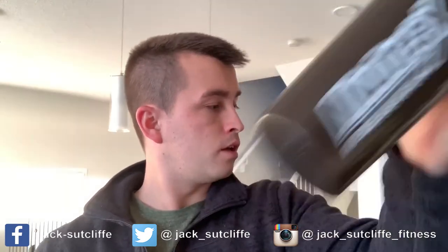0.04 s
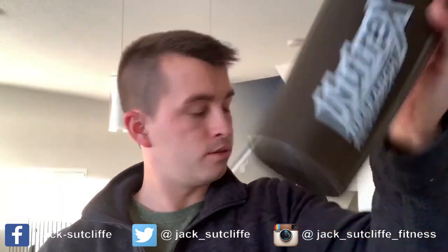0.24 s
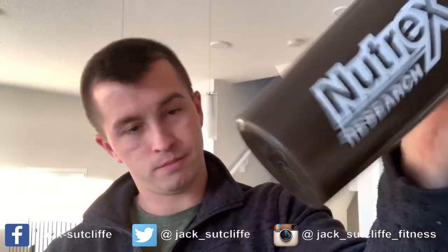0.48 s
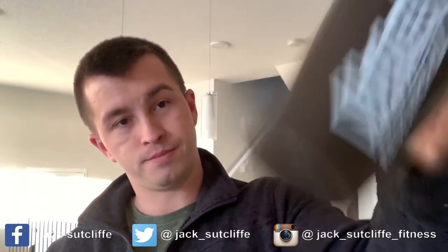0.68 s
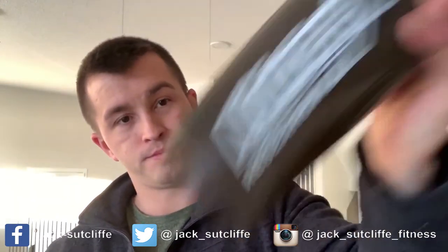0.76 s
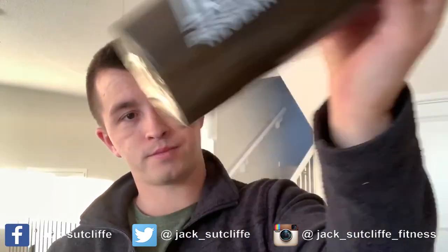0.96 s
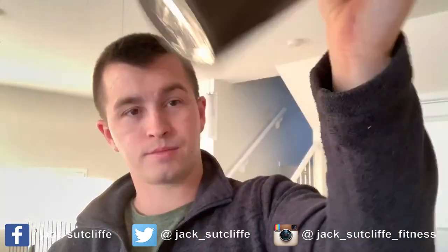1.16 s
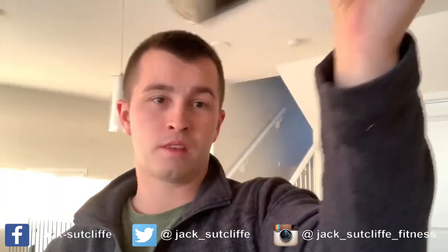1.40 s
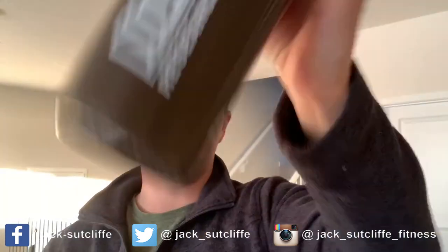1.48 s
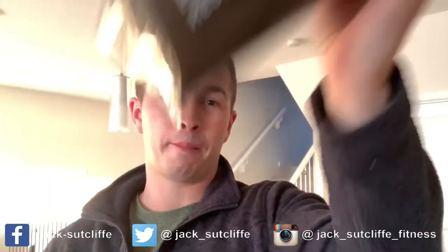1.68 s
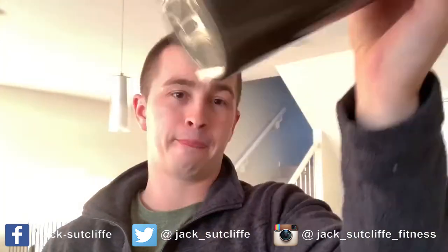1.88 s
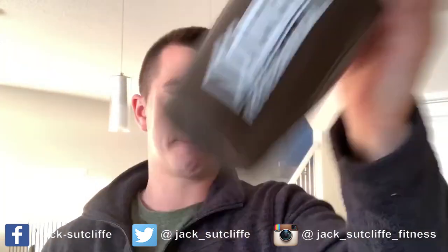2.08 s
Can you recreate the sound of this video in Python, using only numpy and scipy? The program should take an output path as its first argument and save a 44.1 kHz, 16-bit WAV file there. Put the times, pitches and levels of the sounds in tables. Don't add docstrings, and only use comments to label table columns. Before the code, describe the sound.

Close, bright sloshing of liquid in a hand-shaken plastic bottle: each shake sprays the lid, then slaps back onto the base with tiny ticks and gulps, over faint indoor room tone, stopping mid-shake.

```python
import sys
import numpy as np
from scipy import signal
from scipy.fft import rfft, irfft, next_fast_len
from scipy.io import wavfile

SR = 44100
rng = np.random.default_rng(int(sys.argv[2]) if len(sys.argv) > 2 else 0)


def log_audio(samples):
    frames = np.atleast_2d(samples).T
    limited = np.clip(frames, -1, 1)
    pcm = np.round(limited * 32767).astype(np.int16)
    wavfile.write(sys.argv[1], SR, pcm)


def voltage_ratio(decibels):
    exponent = np.asarray(decibels, float) / 20
    return 10 ** exponent


N = 94770

# f/Hz, level/dB
ROOM_TONE_COLOUR = [(40, 1), (150, -6.5), (500, -7.5), (1500, -16), (4000, -22), (8000, -26), (15500, -40)]
# t/s, level/dB, f/Hz
WALL_THUMPS = [(0.034, -60, 62.6), (.118, -50.5, 71), (0.137, -51.5, 51.6), (0.347, -46.5, 58.3),
               (0.089, -56, 60), (0.457, -52.5, 56), (.97, -56, 60), (0.572, -53, 67.6), (0.69, -56, 59.4),
               (0.732, -59, 60), (0.787, -45.5, 68), (0.826, -51.5, 59.6), (0.894, -51, 92.6),
               (1.032, -47, 90.7), (1.067, -49.5, 56), (1.15, -54.5, 59), (1.243, -51, 63.5),
               (1.364, -50.5, 58.4), (1.387, -57, 50), (1.466, -46, 54.6), (1.578, -54.5, 60),
               (1.634, -54.5, 59), (1.692, -50, 62), (1.75, -57.5, 97), (1.84, -55, 97), (1.954, -45, 53),
               (2.075, -56, 56)]
# t/s, peak/dB
WALL_TICKS = [(0.18, -34), (.268, -32), (0.409, -41), (0.4288, -31), (.614, -31), (.7741, -31),
              (.8984, -31), (0.9756, -33), (0.9981, -28), (1.3467, -28), (1.257, -33), (1.5643, -34),
              (1.5797, -31), (1.6656, -29), (1.8227, -29), (1.9309, -31), (1.952, -30), (2.0537, -35),
              (2.0706, -31), (2.135, -32), (2.1464, -26)]
# t/s, peak/dB
SEAL_SPITS = [(0.1526, -44.5), (0.18, -45), (0.1864, -49), (0.1965, -23.5), (0.406, -40), (0.43, -27.5),
              (0.4933, -35), (0.6469, -59), (0.6694, -38), (0.9004, -30.5), (1.1333, -35), (1.1413, -34),
              (1.348, -34), (1.3606, -28), (1.4536, -43), (1.5044, -45), (1.524, -29.5), (1.5454, -50),
              (1.5853, -29), (1.6656, -37), (1.6814, -50), (1.8238, -32.5), (1.831, -26.5), (1.9315, -31.5),
              (1.9494, -36), (2.0695, -39)]
# t/s, peak/dB, f/Hz
BUBBLE_GULPS = [(0.0075, -39, 2280), (0.114, -42, 1100), (0.1206, -44.5, 197), (0.1262, -38, 563),
                (0.223, -32, 2920), (0.3367, -37, 900), (0.3427, -43, 317), (0.4308, -35.5, 3370),
                (0.4719, -34.5, 2180), (0.568, -37.5, 1150), (0.5735, -35, 434), (0.5782, -31.5, 1130),
                (0.5904, -43, 190), (0.672, -38, 3600), (0.6899, -41, 4270), (0.6949, -35, 2240),
                (0.7054, -33, 2340), (0.7106, -34, 1110), (0.7773, -37, 2670), (0.7757, -39.5, 1600),
                (0.8193, -43, 398), (0.9049, -54, 3960), (1.0027, -39.5, 590), (1.0357, -38, 3360),
                (1.0371, -37, 650), (1.0367, -46.5, 337), (1.2436, -40, 590), (1.3489, -37, 1970),
                (1.3634, -32.5, 3960), (1.3639, -42, 1900), (1.4568, -33, 920), (1.465, -44, 196),
                (1.4667, -34, 508), (1.469, -38, 970), (1.5889, -37, 2160), (1.8268, -34, 2310),
                (1.835, -42, 1200), (1.8537, -35.5, 1050), (1.9343, -38.5, 3160), (1.9419, -44, 1235),
                (1.9526, -48, 586), (1.9537, -36.5, 1470), (1.959, -41, 298), (1.965, -44, 966),
                (1.976, -39, 324), (2.0977, -38, 2100), (2.1037, -51, 1310), (2.1476, -45, 2580)]
# t/s, level/dB, start f/Hz, length/s
SLUG_SLAPS = [(0.08, -47.5, 595, 0.019), (0.111, -36, 643, 0.012), (0.327, -42.5, 835, 0.012),
              (0.462, -45.5, 716, 0.016), (0.556, -40.5, 875, 0.029), (0.791, -41, 703, 0.016),
              (1.027, -36, 765, 0.0055), (1.238, -44.5, 795, 0.02), (1.452, -39, 745, 0.039),
              (1.734, -43.5, 650, 0.011), (1.847, -46, 860, 0.0053), (1.944, -40, 610, 0.028),
              (0.209, -40, 3200, 0.017), (1.578, -44, 2500, 0.0041), (1.823, -41.5, 2690, 0.025),
              (2.133, -40, 3950, 0.012)]
# t/s, level/dB, hold/s, tilt/(dB per octave)
LID_SURGES = [(-.02, -39.5, 0.063, -1), (-.003, -38.5, 0.0069, -4), (.058, -44, 0.015, -0.5),
              (.18, -40, 0.043, -0.5), (.21, -41, 0.05, -2.5), (.255, -46, 0.043, -1.5),
              (.422, -38.5, 0.095, -0.5), (.495, -45.5, 0.007, -2), (.664, -37, 0.05, -2),
              (.735, -41.5, 0.07, -3.5), (.888, -36, 0.04, -2.5), (.95, -41, 0.065, -1),
              (1.128, -39.5, 0.046, -3), (1.19, -45, 0.04, -1), (1.343, -37, 0.04, -2),
              (1.358, -41, 0.075, -1), (1.565, -41, 0.095, -2.5), (1.615, -40, 0.014, -1),
              (1.815, -40, 0.08, -2), (2.052, -46.5, 0.025, -3.5), (2.069, -36.5, 0.04, -3),
              (2.134, -47, 0.023, 1)]
# t/s, level/dB, hold/s, tilt/(dB per octave), release/(dB per s)
BASE_SURGES = [(.078, -35.5, 0.058, 0.5, 298), (.11, -45, 0.069, 2.5, 200), (.298, -36.5, 0.026, -0.5, 300),
               (.328, -35.5, 0.0096, -2.5, 298), (.548, -39, 0.015, -1, 303), (.562, -37.5, 0.034, -3, 500),
               (.608, -39.5, 0.012, -3, 900), (.773, -37.5, 0.071, -0.5, 244),
               (.996, -42, 0.007, -1.5, 210), (1.032, -38.5, 0.047, -1.5, 345),
               (1.228, -38, 0.061, -0.5, 300), (1.453, -36, 0.05, 0, 300), (1.664, -35.5, 0.0033, 0.5, 400),
               (1.682, -37.5, 0.043, -0.5, 200), (1.738, -42, 0.049, -1.5, 300),
               (1.93, -35, 0.023, -2.5, 291), (1.949, -39, 0.038, 1, 450)]
# f/Hz, level/dB
LID_SPRAY_COLOUR = [(150, -19), (500, -9), (1100, -4.5), (2300, -4), (4000, -4.5), (7000, 0.5),
                    (11000, -11), (15500, -21)]
# f/Hz, level/dB
BASE_WASH_COLOUR = [(150, -8.5), (500, -9), (1100, -6), (2300, -9), (4000, -7.5), (7000, -6.5),
                    (11000, -20.5), (15500, -28)]
# f/Hz, width/Hz, boost (negative: cut)/dB
SPLASH_PEAKS_AND_DIPS = [(560, 160, 1), (1061, 168, 5.5), (2100, 33, -7), (5400, 1500, -7)]
# f/Hz, phase/rad
RIGHT_PORT_LEAD = [(650, -1.4), (1500, -.1), (4300, 2.3), (7500, 2.85), (9200, 3.45), (11300, 5.95),
                   (13700, 6.6), (15600, 9.4)]
# f/Hz, likeness/(0-1)
PORT_COHERENCE = [(60, 0.73), (400, 0.58), (1400, 0.48), (2800, 0.083), (5000, 0.54), (7000, 0.8)]
# f/Hz, level/dB
LEFT_OVER_RIGHT = [(60, 5), (150, 1.5), (500, 1), (1400, 5), (4000, 2), (6500, 0)]

ROOM_DB, ECHO_DB, ECHO_T60_S = -57, -14, 0.14
SHARED_ABOVE_HZ = 7600
THUMP_RISE_S, THUMP_FALL_S = 0.0072, 0.018
GULP_CYCLES, GULP_LONGEST_S, GULP_SHORTEST_S = 4, 0.0073, 0.00044
GULP_RISE_SHARE, GULP_GLIDE, GULP_GAIN_DB = 0.64, 0.03, 0.4
SLAP_Q, SLAP_FALL_OCT_PER_S, SLAP_DROPS_PER_S = 3.2, 31.8, 1600
ATTACK_S, SAG_DB_PER_S, RELEASE_DB_PER_S, TREBLE_SAG_DB_PER_S = 0.0027, 48, 283, 28
LID_EARLY_DB, BASE_EARLY_DB, SWELL_S = 5.5, 0.5, 0.02
CONTACT_TREBLE_DB, CONTACT_TREBLE_S = -1.5, 0.0072
DROPS_PER_S, DROP_SPREAD_DB, DRIP_DB, FLICKER_DB = 4500, 4.5, -56, 3.0
BUBBLES_PER_S, BUBBLE_CYCLES, BUBBLE_DB = 60, 30.0, -4.5


def rms_one(x):
    return x / np.sqrt(np.mean(x ** 2) + 1e-20)


def at_hz(points, hz):
    f, value = np.array(points).T
    return np.interp(np.log(hz), np.log(f), value)


def resonator(hz, radius):
    return [1, 0, -1], [1, -2 * radius * np.cos(2 * np.pi * hz / SR), radius * radius]


def drift(rate):
    steps = rng.standard_normal(400)
    return np.interp(np.arange(N) / SR * rate, np.arange(400), steps) * 1.2


def drops(per_s, spread_db):
    sizes = voltage_ratio(spread_db * np.minimum(rng.exponential(1, N), 4)) * rng.choice([-1, 1], N)
    return rms_one(sizes * (rng.random(N) < per_s / SR) + 1e-9)


def room_tone():
    hz = np.maximum(np.arange(N // 2 + 1) * SR / N, 1)
    spectrum = rfft(rng.standard_normal((2, N)))
    air = irfft(spectrum * voltage_ratio(at_hz(ROOM_TONE_COLOUR, hz)) * (hz > 35), N)
    return voltage_ratio(ROOM_DB) * rms_one(air)


def thumps():
    out, age = np.zeros(N + SR), np.arange(int(0.1 * SR)) / SR
    rise = np.clip(age / THUMP_RISE_S, 0, 1) ** 2
    shape = rise * np.exp(-np.maximum(age - THUMP_RISE_S, 0) / THUMP_FALL_S)
    for (s, db, hz), phase in zip(WALL_THUMPS, rng.random(len(WALL_THUMPS))):
        cycles = hz * (age + 0.0068 * (1 - np.exp(-age / 0.005)))
        start = int(s * SR)
        out[start:start + len(age)] += voltage_ratio(db + 8.5) * shape * np.sin(2 * np.pi * (cycles + phase))
    return out[:N]


def cracks(rows, gain_db, decay_s, low_hz, top_hz):
    out, age = np.zeros(N + SR), np.arange(500) / SR
    band = signal.butter(2, [low_hz, top_hz], "band", fs=SR, output="sos")
    for (s, db), noise in zip(rows, rng.standard_normal((len(rows), len(age)))):
        crack = signal.sosfilt(band, noise * np.exp(-age / decay_s))
        start = int(s * SR)
        out[start:start + len(age)] += voltage_ratio(db + gain_db) * crack / np.abs(crack).max()
    return out[:N]


def ticks():
    wall = cracks(WALL_TICKS, gain_db=-1.5, decay_s=0.0008, low_hz=700, top_hz=7000)
    seal = cracks(SEAL_SPITS, gain_db=-3.5, decay_s=0.0028, low_hz=6700, top_hz=15000)
    return wall + seal


def gulps():
    lead = 1000
    out, age = np.zeros(N + SR), np.arange(-lead, 1500) / SR
    for (s, db, hz), phase in zip(BUBBLE_GULPS, rng.random(len(BUBBLE_GULPS))):
        span = min(GULP_CYCLES / hz, GULP_LONGEST_S) + GULP_SHORTEST_S
        side = span * np.where(age < 0, GULP_RISE_SHARE, 1)
        shape = np.exp(-0.5 * (age / side) ** 2)
        cycles = hz * age * (1 + GULP_GLIDE * age / span)
        start = int(s * SR)
        out[start:start + len(age)] += voltage_ratio(db + GULP_GAIN_DB) * shape * np.sin(2 * np.pi * (cycles + phase))
    return out[lead:N + lead]


def slaps():
    out, rain = np.zeros(N + SR), drops(SLAP_DROPS_PER_S, 3.8)
    n = int(0.09 * SR)
    age = np.arange(n) / SR
    for s, db, hz, length in SLUG_SLAPS:
        start, state, ring = int(s * SR), np.zeros(2), np.zeros(n)
        gate = np.clip(age / 0.002, 0, 1) * voltage_ratio(-500 * np.maximum(age - length, 0))
        push = np.resize(rain[start:start + n], n) * gate
        for i in range(0, n, 64):
            f = max(hz * 2 ** (-SLAP_FALL_OCT_PER_S * min(age[i], length + 0.011)), 90)
            radius = np.exp(-np.pi * f / SLAP_Q / SR)
            b, a = resonator(f, radius)
            ring[i:i + 64], state = signal.lfilter(b, a, np.sqrt(1 - radius) * push[i:i + 64], zi=state)
        body = ring[:int((length + 0.008) * SR)]
        out[start:start + n] += voltage_ratio(db) * ring / np.sqrt(np.mean(body ** 2) + 1e-12)
    return out[:N]


def surge(rows, early_db, hz):
    t, power = np.arange(0, N + 32, 32) / SR, 0
    octaves = np.log2(hz / 3000)
    above, below = max(octaves, 0), max(-octaves, 0)
    for s, db, hold, tilt, *own_release in rows:
        age = np.maximum(t - s, 0)
        release = own_release[0] if own_release and own_release[0] is not None else RELEASE_DB_PER_S
        sag = (SAG_DB_PER_S + TREBLE_SAG_DB_PER_S * above) * age
        fall = sag + release * np.maximum(age - hold, 0)
        swell = early_db * below * np.exp(-(age / SWELL_S) ** 2)
        contact_treble = CONTACT_TREBLE_DB * above * np.exp(-age / CONTACT_TREBLE_S)
        level = db + tilt * octaves - fall - swell + contact_treble
        power = power + (np.clip(age / ATTACK_S, 0, 1) * voltage_ratio(level)) ** 2
    return np.interp(np.arange(N) / SR, t, power)


def spray():
    edges, out = 130 * 2 ** np.arange(0, 7.1, 1 / 3), np.zeros((2, N))
    rain = [np.array([drops(DROPS_PER_S, DROP_SPREAD_DB) for _ in range(2)]) for _ in range(2)]
    together = drift(90)
    for k, (low, high) in enumerate(zip(edges, edges[1:])):
        hz = np.sqrt(low * high)
        slice_filter = signal.butter(2, [low, high], "band", fs=SR, output="sos")
        band = signal.sosfilt(slice_filter, rain[k % 2])

        b, a = resonator(rng.uniform(low, high), voltage_ratio(-60 * hz / BUBBLE_CYCLES / SR))
        ping = signal.lfilter(b, a, drops(BUBBLES_PER_S * np.sqrt(hz / 500), 2.9))
        band += voltage_ratio(BUBBLE_DB) * rms_one(ping) * np.sqrt((high - low) / SR * 2) * (hz < 7000)

        lid_db = at_hz(LID_SPRAY_COLOUR, hz)
        lid = surge(LID_SURGES, LID_EARLY_DB, hz) * voltage_ratio(lid_db) ** 2
        base = surge(BASE_SURGES, BASE_EARLY_DB, hz) * voltage_ratio(at_hz(BASE_WASH_COLOUR, hz)) ** 2
        drip = voltage_ratio(DRIP_DB + lid_db) ** 2
        peak_dip_db = sum(db / (1 + (2 * (hz - f) / width) ** 2) for f, width, db in SPLASH_PEAKS_AND_DIPS)
        flicker_db = FLICKER_DB * (0.22 * together + 0.75 * drift(45.14))
        out += band * np.sqrt(lid + base + drip) * voltage_ratio(peak_dip_db + flicker_db)
    return out * voltage_ratio(8)


def ports(near, other):
    size = next_fast_len(N + SR)
    hz = np.maximum(np.arange(size // 2 + 1) * SR / size, 1)
    age = np.arange(SR // 2) / SR
    tails = rng.standard_normal((2, SR // 2)) * voltage_ratio(-60 * age / ECHO_T60_S) * (age > 0.006)
    tails = rfft(tails / np.sqrt(np.sum(tails[0] ** 2)), size)
    tails = tails * voltage_ratio(ECHO_DB) / (1 + (hz / 4000) ** 6)

    alike = np.clip(at_hz(PORT_COHERENCE + [(SHARED_ABOVE_HZ, 0.985)], hz), 0, 1)
    lean = voltage_ratio(at_hz(LEFT_OVER_RIGHT + [(SHARED_ABOVE_HZ, 0)], hz) / 2)
    lead = np.interp(hz, *np.transpose([(0, 0)] + RIGHT_PORT_LEAD))
    near, other = rfft(near, size), rfft(other, size)
    right = alike * np.exp(1j * lead) * near + np.sqrt(1 - alike ** 2) * other
    return irfft(np.array([lean * near, right / lean]) + near * tails, size)[:, :N]


def scene():
    near, other = spray() + thumps() + ticks()
    near = near + slaps() + gulps()
    other = other + slaps() + gulps()
    return ports(near, other) + room_tone()


def low_pass(x):
    return signal.sosfilt(signal.butter(12, 15770, fs=SR, output="sos"), x)


def record(dry):
    top_cut = signal.cheby2(16, 60, 16150, fs=SR, output="sos")
    low_cut = signal.butter(2, 30, "high", fs=SR, output="sos")
    mix = signal.sosfilt(low_cut, signal.sosfilt(top_cut, dry))
    return low_pass(mix)


dry = scene()
out = record(dry)
log_audio(out)
```